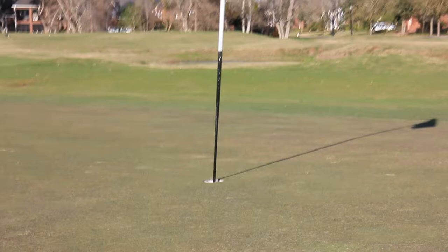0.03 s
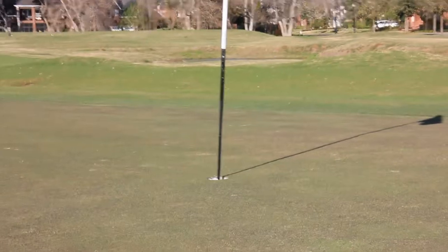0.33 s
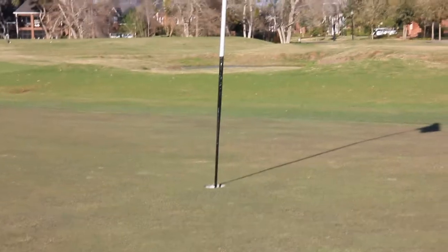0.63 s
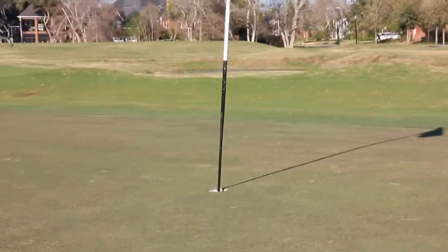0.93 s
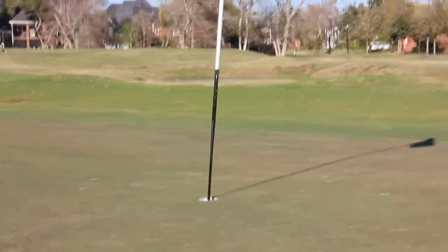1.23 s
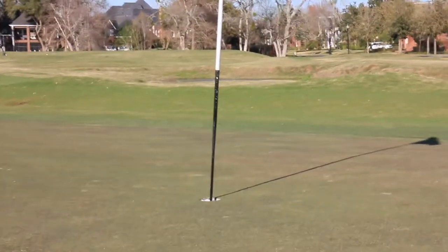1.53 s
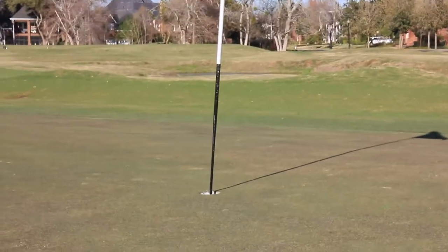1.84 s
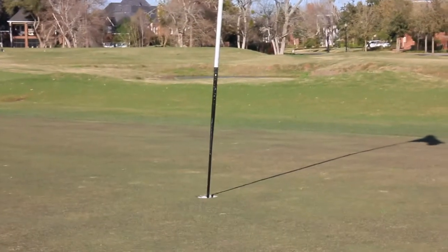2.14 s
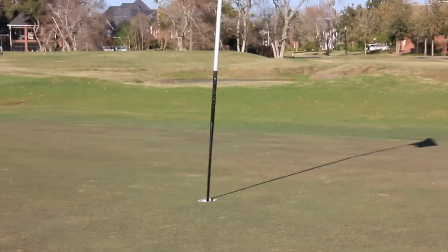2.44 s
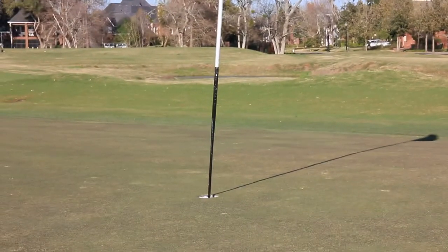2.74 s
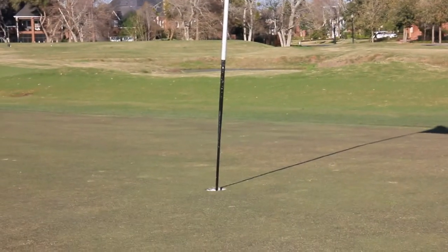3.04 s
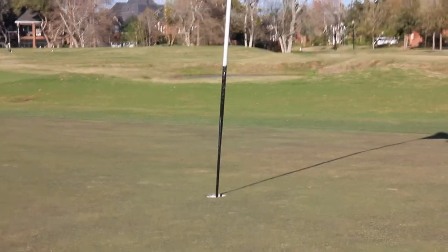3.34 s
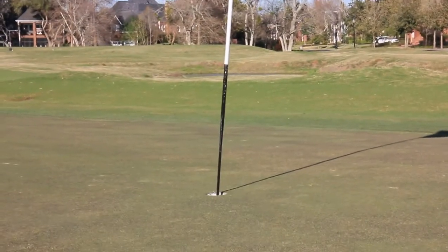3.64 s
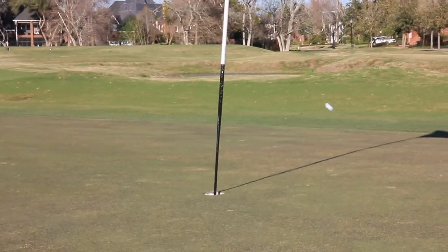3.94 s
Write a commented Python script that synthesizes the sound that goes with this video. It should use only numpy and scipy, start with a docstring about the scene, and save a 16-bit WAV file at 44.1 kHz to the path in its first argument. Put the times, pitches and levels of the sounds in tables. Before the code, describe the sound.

A low outdoor breeze rumbles and eases before a golf ball thuds once onto the green.

```python
"""Breezy golf green

Eddies buffet the microphone in short, low puffs over a rumbling breeze and a steady wash of far wind
and traffic. Something rustles faintly and a distant bird whistles two notes. Near the end a ball
lands with one short thud: a slap, a crunch of grass and a few damped swings of the turf."""
import sys
import numpy as np
from scipy import signal
from scipy.fft import rfft, irfft
from scipy.io import wavfile

SR = 44100
rng = np.random.default_rng(int(sys.argv[2]) if len(sys.argv) > 2 else 0)


def store_wav(level_fs):
    """Save 16-bit WAV to argv[1]."""
    pcm = np.round(np.clip(np.atleast_2d(level_fs), -1, 1) * 32767)
    wavfile.write(sys.argv[1], SR, pcm.T.astype(np.int16))


N = 176400


def buffets():
    """Each eddy is a short swell of low turbulent pressure; the strong ones tear with a little rasp."""
    # Eddies hitting the microphone. Each row: centre in seconds, level in dB, half length in seconds,
    # upper edge in Hz.
    eddies = [ (.078, -45.5, 0.0083, 297), (0.109, -29.5, 0.0025, 430), (0.127, -39.5, 0.0086, 298),
              (0.157, -28.5, 0.0078, 312), (0.202, -43, 0.0065, 216), (.219, -39, 0.0083, 212),
              (0.254, -40, 0.0067, 185), (.298, -46.5, .008, 233), (.329, -48, 0.0077, 249),
              (.393, -43.5, 0.0064, 184), (0.459, -35.5, 0.0078, 246), (.495, -40.5, .004, 220),
              (.527, -47, 0.0037, 220), (0.55, -45.5, 0.0025, 220), (0.634, -45, 0.0037, 246),
              (0.645, -44, 0.0025, 245), (.930, -46.5, 0.0043, 170), (1.497, -45.5, 0.0056, 308),
              (1.566, -45, 0.0075, 261), (1.63, -41, 0.01, 257), (1.776, -45, 0.0027, 234),
              (1.984, -58, 0.0062, 139), (3.253, -39.5, 0.0073, 159)]
    out, size = np.zeros(N), 8192
    t = (np.arange(size) - size / 2) / SR
    strongest_db = max(row[1] for row in eddies)
    for at_s, db, half_s, edge_hz in eddies:
        swell = np.exp(-.5 * (t / half_s) ** 2)
        turbulence = band(low_hz=59.4, high_hz=edge_hz, slope=3.46, size=size)
        puff = unit(swell * turbulence) * np.sqrt(np.mean(swell ** 2))
        rasp_db = -53.5 + 1.07 * (db - strongest_db)  # weaker eddies rasp less
        rasp = swell * band(low_hz=750, high_hz=1160, size=size) * undb(rasp_db)
        add(out, at_s + t[0], undb(db) * puff + rasp)
    return cut(out, hz=1540, kind="lowpass", order=4)


def ball():
    """The ball slaps the ground, crushes the grass and sets the turf swinging briefly."""
    # Modes of the turf. Each row: frequency in Hz, level in dB, time to fall 60 dB in seconds.
    turf_modes = [(293, -31, .029), (395, -54, 0.028), (620, -37.5, 0.032), (990, -39, 0.016),
                  (1380, -45, 0.026), (2800, -59, 0.015)]
    landing_s, contact_s, rebound_s, turf_rise_s = 3.8638, .0002, .00069, .0006
    out, size = np.zeros(N), 4096
    t = np.arange(size) / SR
    slap = -undb(-28) * (t / contact_s) * np.exp(1 - t / contact_s)
    grass = undb(-52.5) * band(low_hz=4500, high_hz=6460, size=size) * decay(t, t60_s=.005)
    turf = sum(undb(db) * np.sin(2 * np.pi * hz * t) * decay(t, t60_s) for hz, db, t60_s in turf_modes)
    attack = 1 - np.exp(-t / turf_rise_s)  # soft ground takes a moment to swing fully
    add(out, landing_s, slap + grass)
    add(out, landing_s + rebound_s, turf * attack)
    return cut(out, hz=130, kind="highpass", order=1)  # so small a patch radiates no deep bass


def breeze(t):
    """Wind on the microphone: a low rumble that dies down after the first gust."""
    # The rumble's envelope. Each row: time in seconds, level in dB.
    envelope = [(.07, -44), (.2, -48), (.35, -52.5), (.55, -58), (.75, -60), (.95, -61), (1.25, -60),
                (1.6, -55), (1.9, -64), (2.2, -59.5), (3.0, -64), (3.6, -66), (4.0, -70)]
    level_db = np.interp(t, *np.array(envelope).T)
    return band(low_hz=36, high_hz=156, slope=2.34) * undb(level_db)


def bird(t):
    """Thin, far whistles that scoop up to pitch and linger among the trees."""
    # The bird's notes. Each row: start in seconds, length in seconds, pitch in Hz, level in dB.
    notes = [(1.875, 0.057, 2870, -70), (1.955, 0.062, 2850, -73)]
    scoop_depth, scoop_s, echo_db = .07, .0085, -5
    whistles = np.zeros(N)
    for at_s, length_s, hz, db in notes:
        age = np.arange(int(length_s * SR)) / SR
        pitch_hz = hz * (1 - scoop_depth * np.exp(-age / scoop_s))
        arch = np.sin(np.pi * age / length_s)
        add(whistles, at_s, undb(db) * arch * np.sin(2 * np.pi * np.cumsum(pitch_hz) / SR))
    trees = unit(rng.standard_normal(N) * decay(t, t60_s=.9)) / np.sqrt(N)
    return whistles + undb(echo_db) * signal.fftconvolve(whistles, trees)[:N]


def rustles(t):
    """Brief, faint swells of narrow hiss."""
    # Background rustles. Each row: centre in seconds, level in dB, half length in seconds,
    # low and high edge in Hz.
    swells = [(.265, -69, .025, 1900, 2500), (0.378, -72, 0.029, 1900, 2480),
              (1.295, -69, .004, 8500, 11000)]
    out = np.zeros(N)
    for at_s, db, half_s, low_hz, high_hz in swells:
        swell = np.exp(-.5 * ((t - at_s) / half_s) ** 2)
        out += undb(db) * band(low_hz, high_hz, slope=7) * swell
    return out


def air():
    """A steady bed of far wind and traffic with a fine hiss on top."""
    # Tone curve of the outdoor air. Each row: frequency in Hz, relative level in dB.
    tone_curve = [(20, -5), (45, -12.5), (72, -3), (105, -5.5), (190, -3), (290, -10.5), (420, -16.5),
                  (600, -17), (800, -15), (1050, -14.5), (1500, -21.5), (2100, -25), (3100, -30),
                  (5000, -32.5), (9000, -35), (16000, -37)]
    curve_hz, curve_db = np.array(tone_curve).T
    wash = noise(lambda hz: undb(np.interp(np.log(hz), np.log(curve_hz), curve_db)))
    return wash * undb(-56 + .04 * drift(rate_hz=1.7))


def undb(db):
    """Decibels to gain."""
    return 10 ** (np.asarray(db) / 20)


def unit(x):
    """Scale to rms 1."""
    return x / np.sqrt(np.mean(x ** 2) + 1e-30)


def decay(t, t60_s):
    """An envelope that falls 60 dB in t60_s."""
    return np.exp(-np.log(1000) * t / t60_s)


def noise(gain, size=N):
    """Noise of rms 1 whose spectrum follows gain(Hz)."""
    hz = np.maximum(np.fft.rfftfreq(size, 1 / SR), 1)
    return unit(irfft(rfft(rng.standard_normal(size)) * gain(hz), size))


def band(low_hz, high_hz, slope=4, size=N):
    """Noise between two soft edges; slope sets how steep the upper one is."""
    return noise(lambda hz: 1 / np.sqrt((1 + (low_hz / hz) ** 4) * (1 + (hz / high_hz) ** (2 * slope))),
                 size)


def drift(rate_hz):
    """A slow random wander around zero, rms 1."""
    return noise(lambda hz: np.exp(-(hz / rate_hz) ** 2) * (np.arange(len(hz)) > 0))


def cut(x, hz, kind, order):
    """Smooth high-pass or low-pass."""
    return signal.sosfilt(signal.butter(order, hz, kind, fs=SR, output="sos"), x)


def add(out, at_s, x):
    """Mix x into out from a given time."""
    start = int(at_s * SR)
    lo, hi = max(start, 0), min(start + len(x), len(out))
    out[lo:hi] += x[lo - start:hi - start]


def scene():
    """All sources mixed in mono at one microphone."""
    t = np.arange(N) / SR
    return (air() + breeze(t) + buffets() + ball() + bird(t) + rustles(t))[None]


def record(dry):
    """The microphone opens after a moment of silence, and a steep low-pass trims the highest treble."""
    open_s, top_hz = .0715, 15750
    live = np.arange(N) / SR >= open_s
    return signal.sosfilt(signal.ellip(12, .1, 70, top_hz, fs=SR, output="sos"), dry * live)


dry = scene()
out = record(dry)
store_wav(out)
```